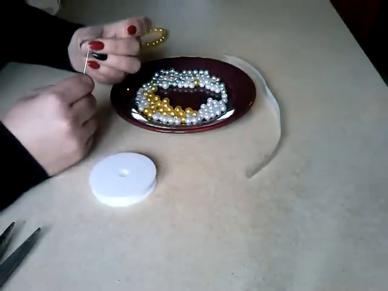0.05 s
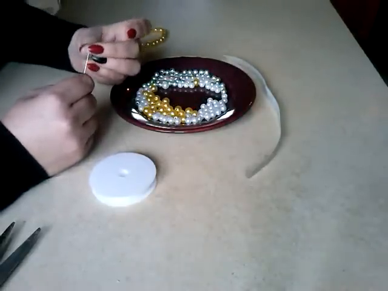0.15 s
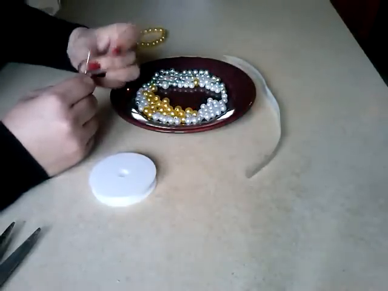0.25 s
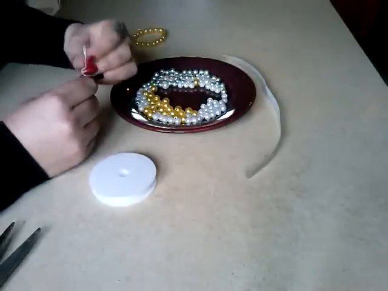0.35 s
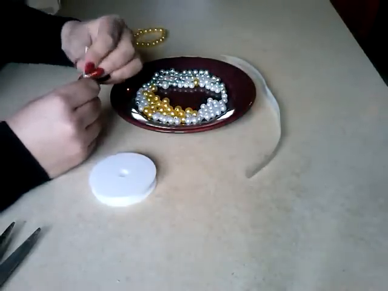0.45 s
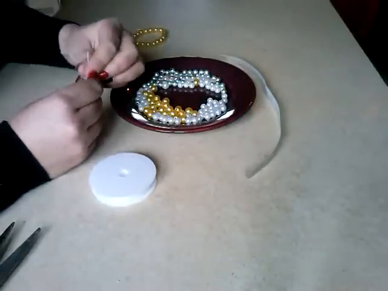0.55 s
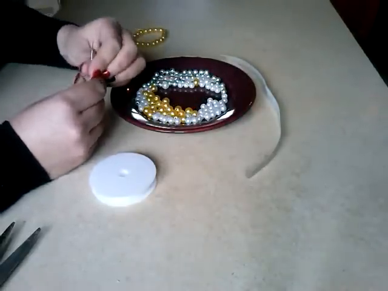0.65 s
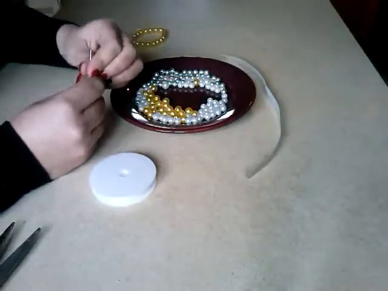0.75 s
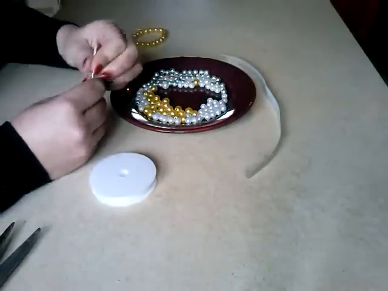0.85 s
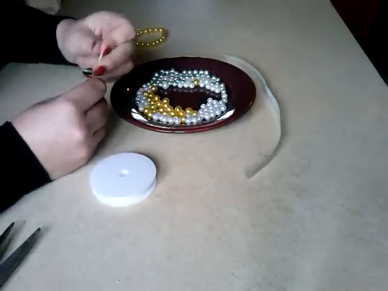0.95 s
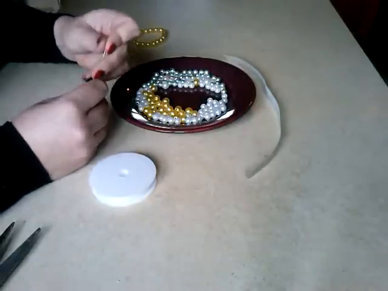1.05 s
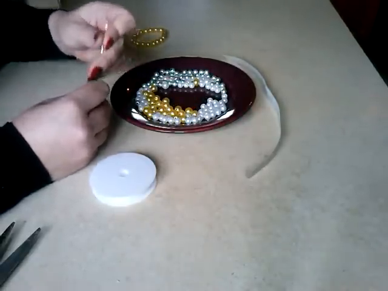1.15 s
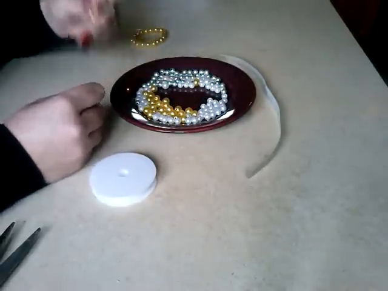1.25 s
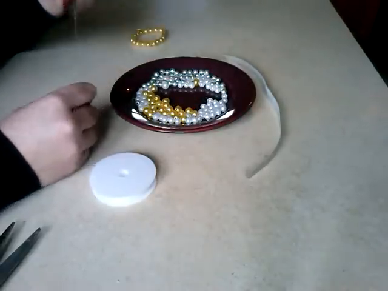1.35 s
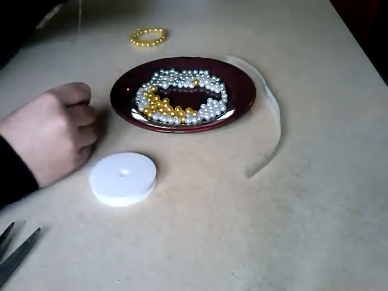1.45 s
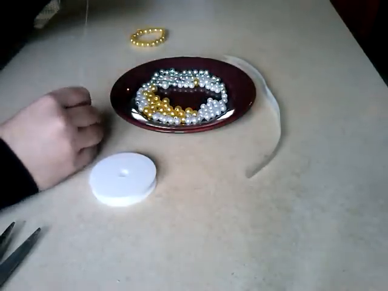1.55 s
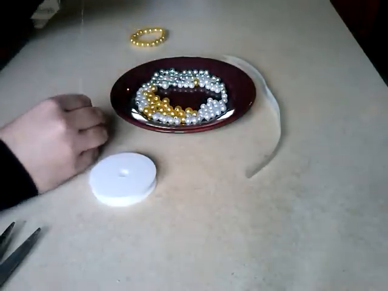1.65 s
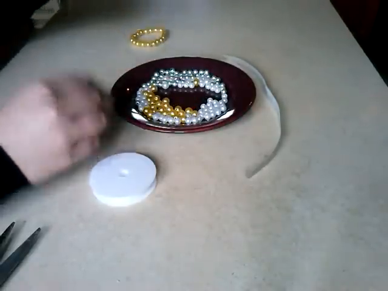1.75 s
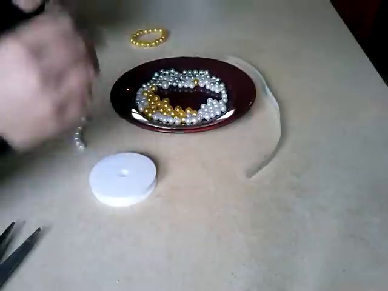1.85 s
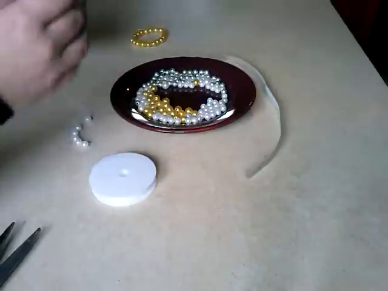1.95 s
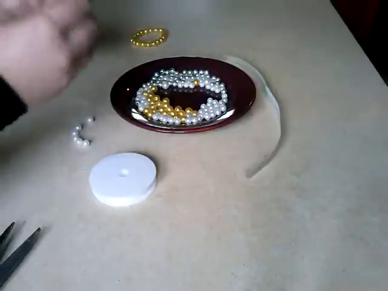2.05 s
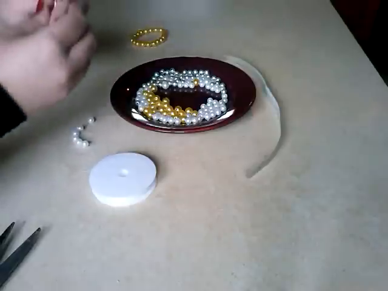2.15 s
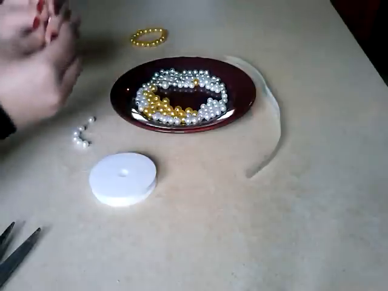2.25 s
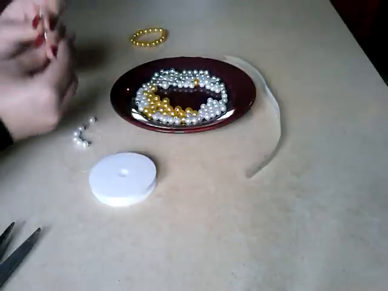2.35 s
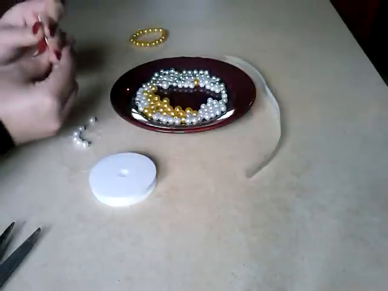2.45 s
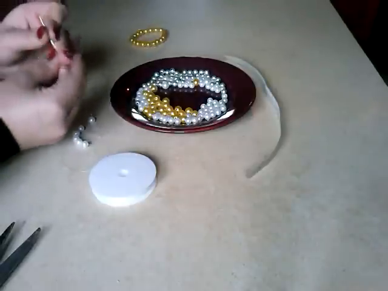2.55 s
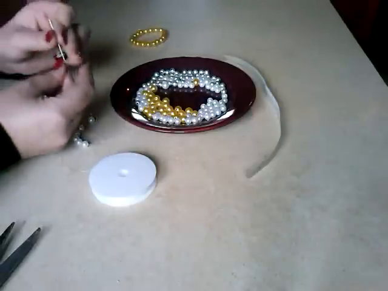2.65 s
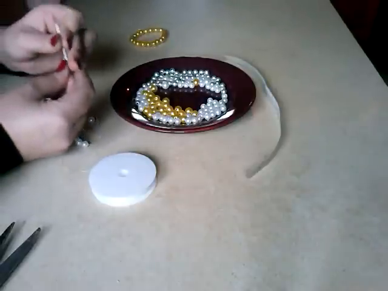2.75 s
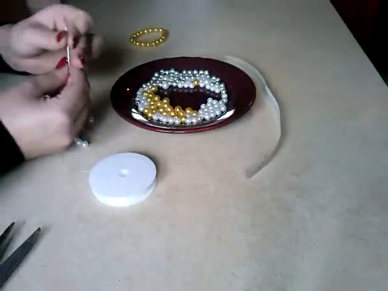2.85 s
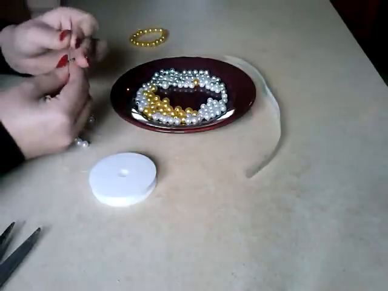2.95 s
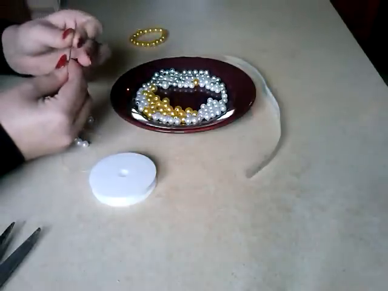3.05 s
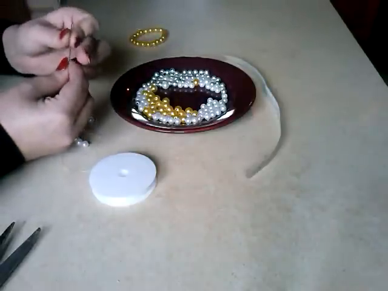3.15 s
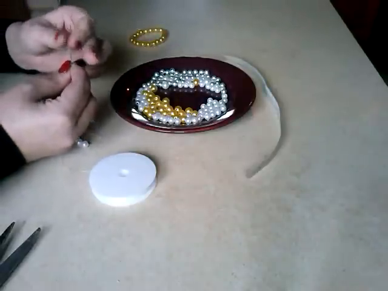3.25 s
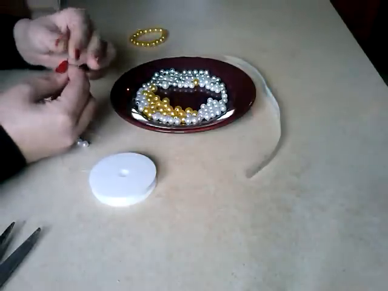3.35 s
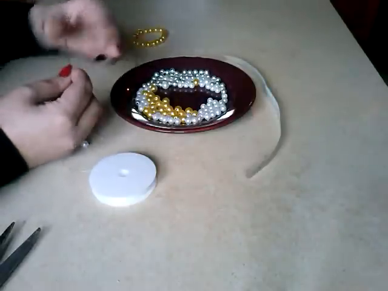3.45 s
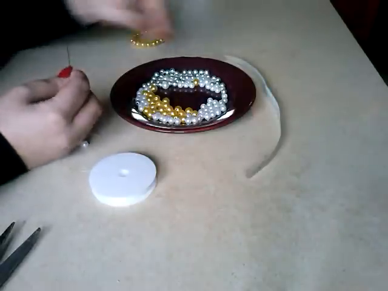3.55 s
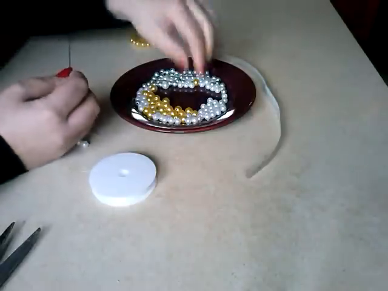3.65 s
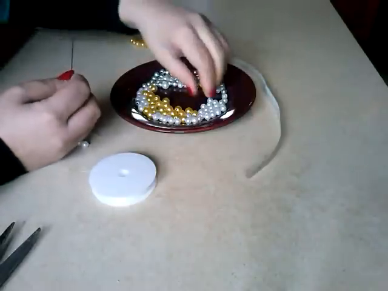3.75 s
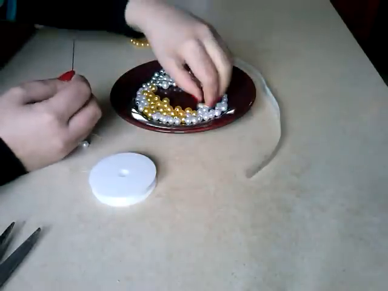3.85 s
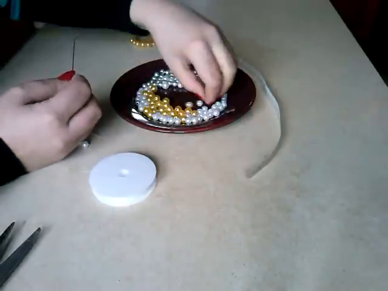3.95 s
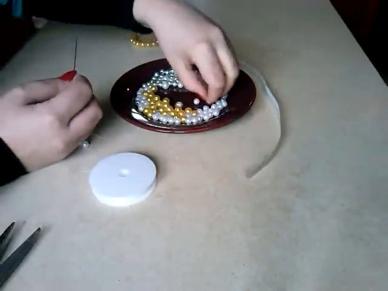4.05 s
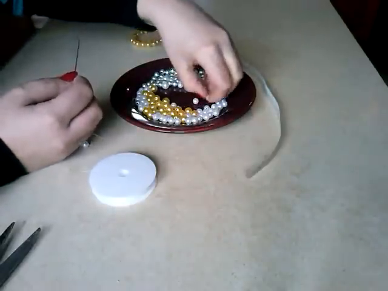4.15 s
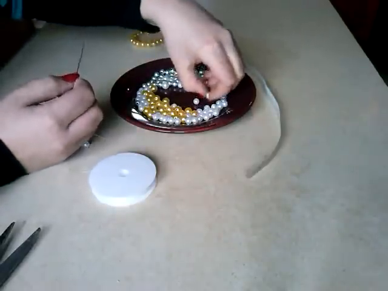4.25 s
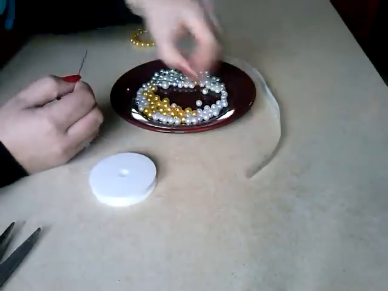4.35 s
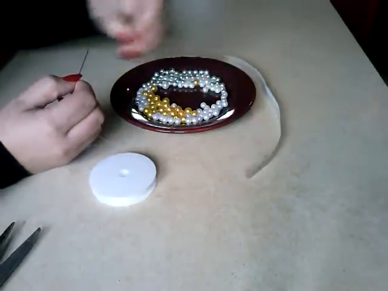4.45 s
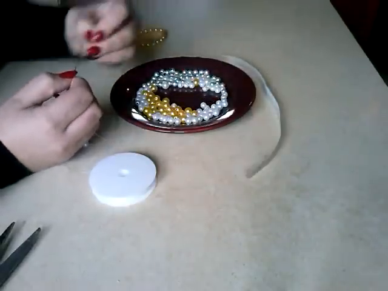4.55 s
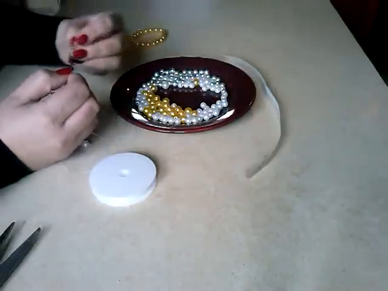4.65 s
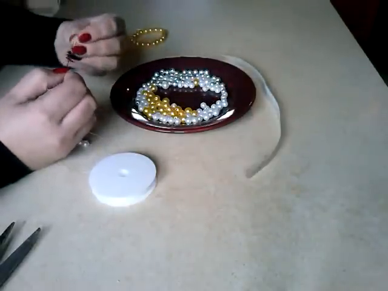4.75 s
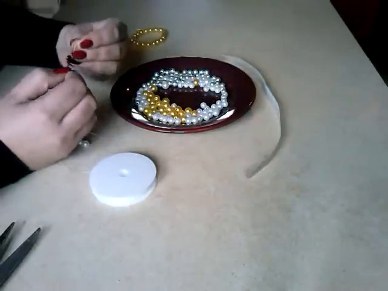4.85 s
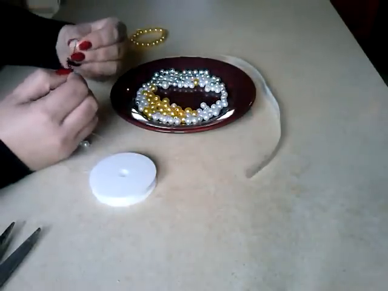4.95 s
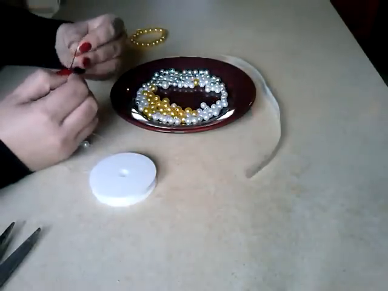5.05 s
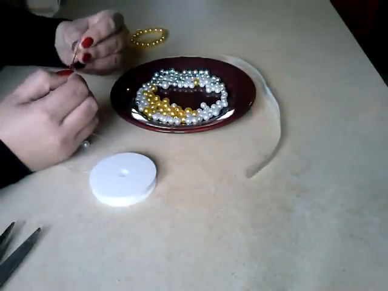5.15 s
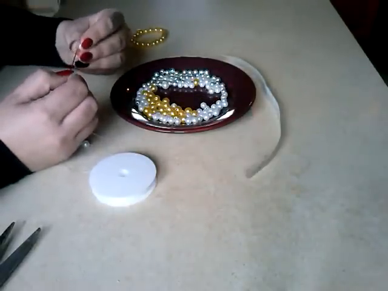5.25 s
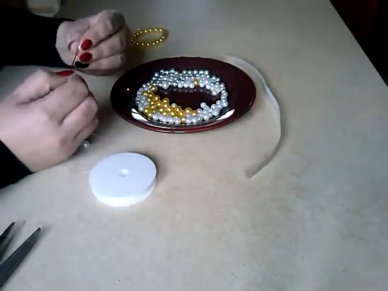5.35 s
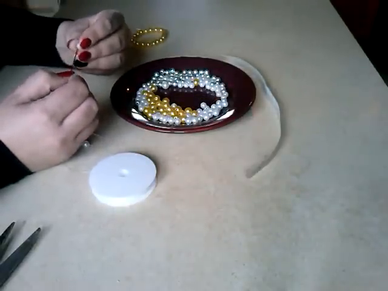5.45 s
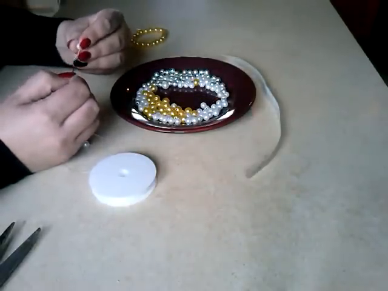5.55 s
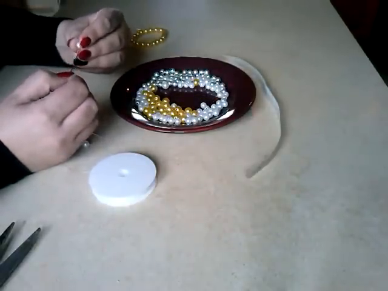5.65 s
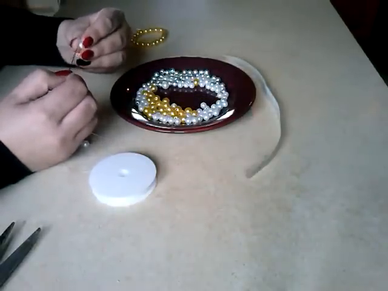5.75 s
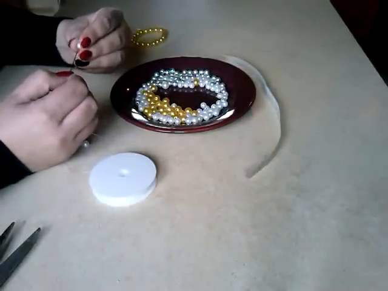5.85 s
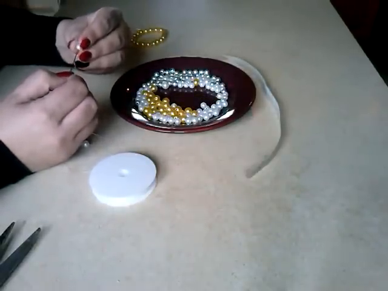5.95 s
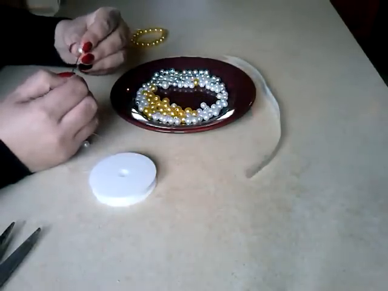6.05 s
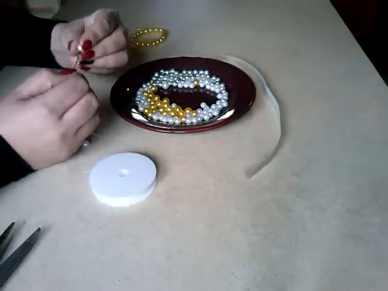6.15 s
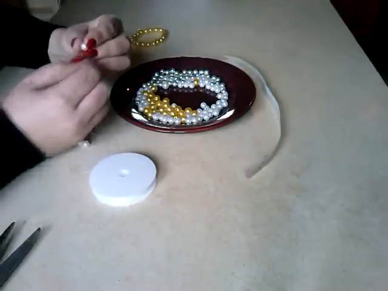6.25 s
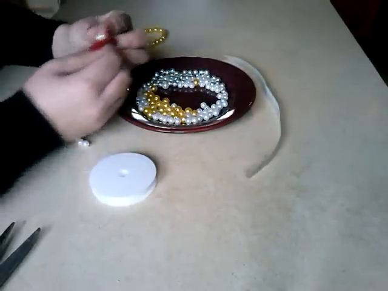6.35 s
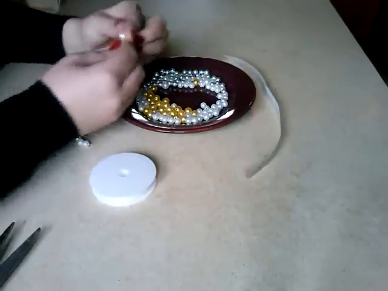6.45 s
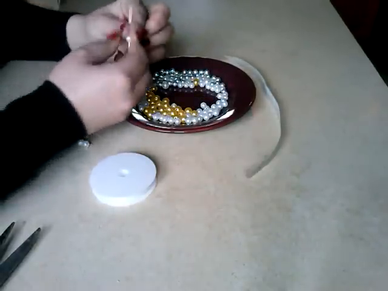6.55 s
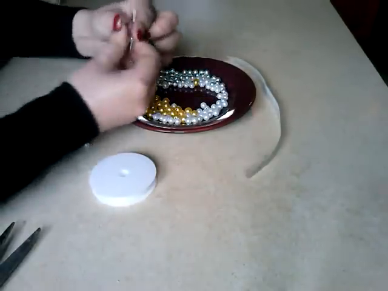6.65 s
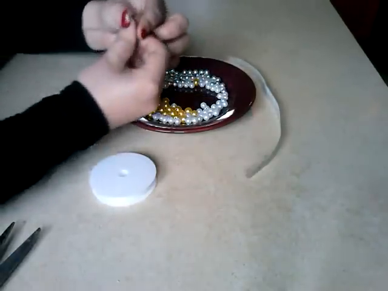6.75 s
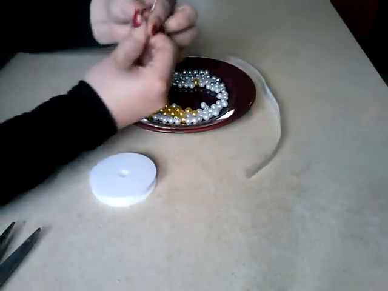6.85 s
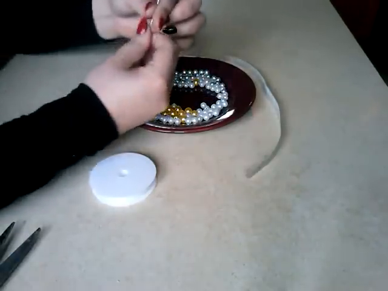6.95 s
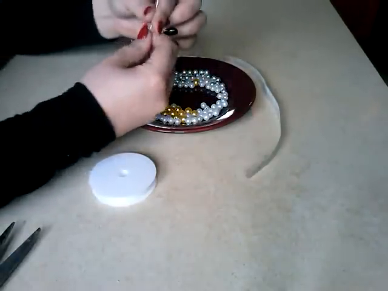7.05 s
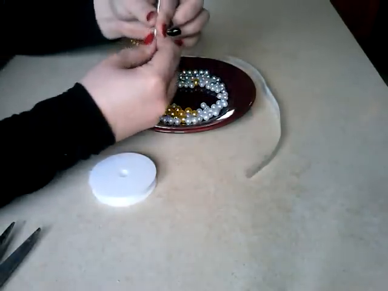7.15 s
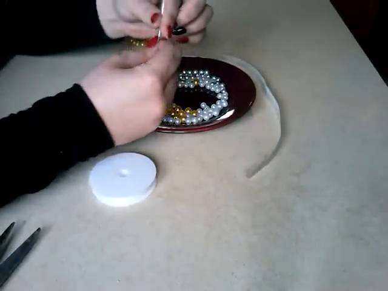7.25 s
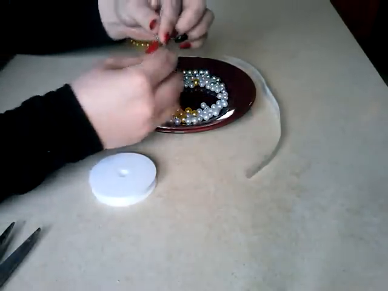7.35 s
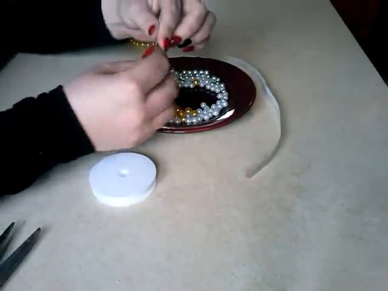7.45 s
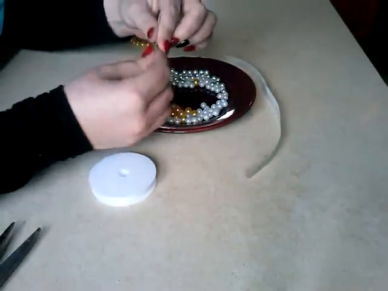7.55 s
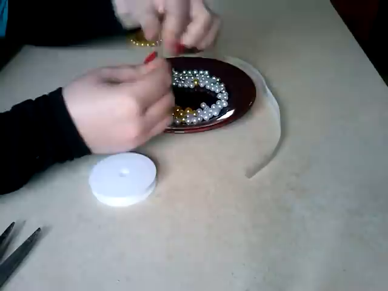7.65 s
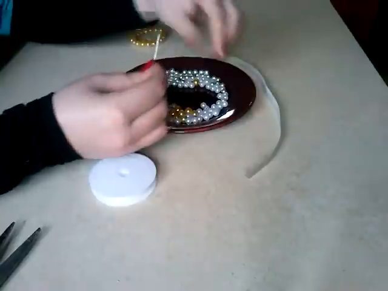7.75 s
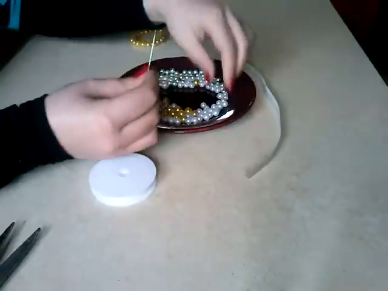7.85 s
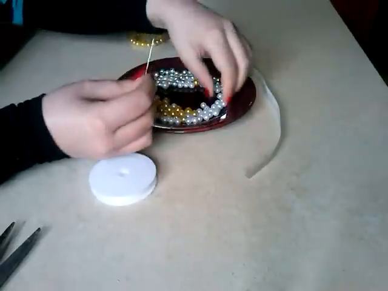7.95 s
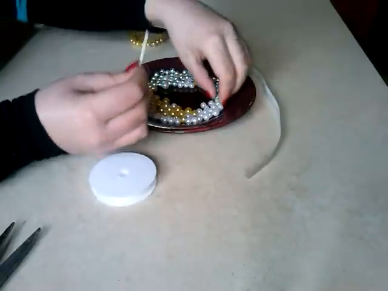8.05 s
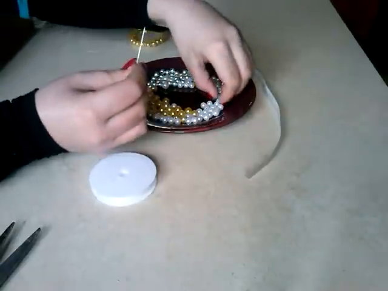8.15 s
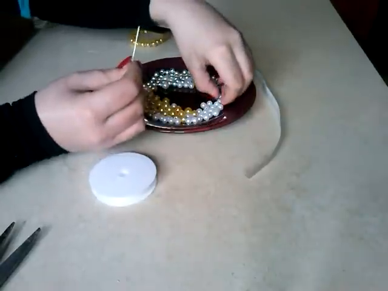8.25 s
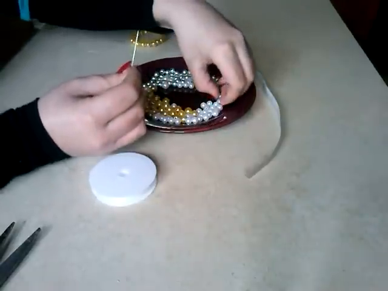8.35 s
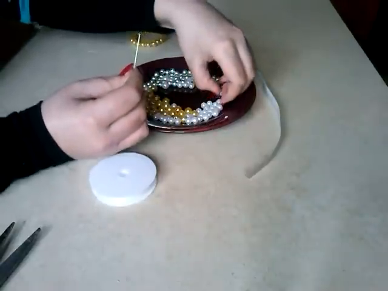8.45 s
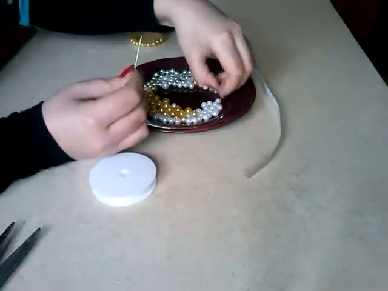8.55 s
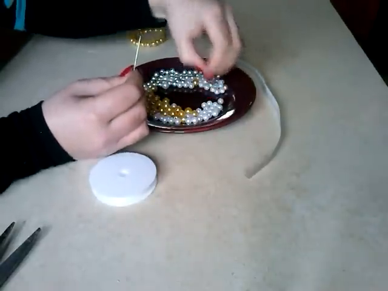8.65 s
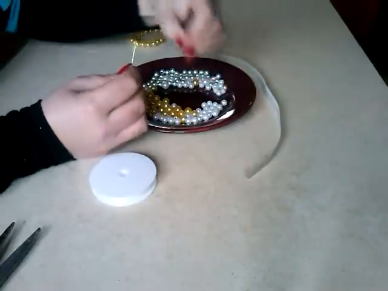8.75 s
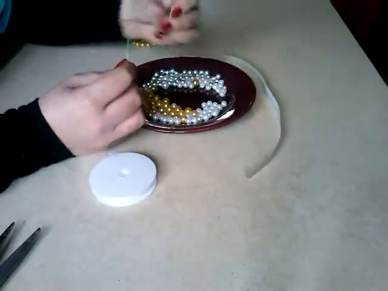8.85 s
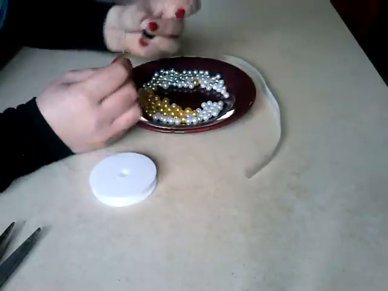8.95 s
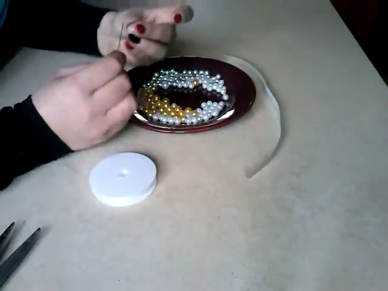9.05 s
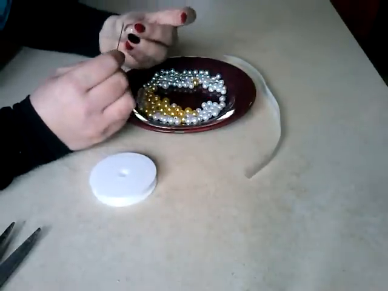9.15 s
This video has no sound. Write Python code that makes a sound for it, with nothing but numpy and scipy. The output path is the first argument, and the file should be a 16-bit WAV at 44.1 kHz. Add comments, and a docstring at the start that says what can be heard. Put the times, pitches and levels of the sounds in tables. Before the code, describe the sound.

Beads click and scatter on a hard tabletop, fingers rattle through a plate of beads, and a sharp plate clink rings while a clock ticks.

```python
"""Stringing beads at a table

Fingers stir a plate of beads, which rings in dying modes chosen by the place struck. Strung and loose
beads tick on the table top (short coloured clicks plus a knock), skitter and drag (random contacts, noise);
nails and wrists give soft blows, a wall clock rings its case once a second.
A quiet, hard room returns the clicks as echoes and dense tails, over faint hiss and hum."""
import sys
import numpy as np
from scipy import signal
from scipy.io import wavfile
from scipy.ndimage import uniform_filter1d

SR = 44100
rng = np.random.default_rng(int(sys.argv[2]) if len(sys.argv) > 2 else 0)


def file_out(sig):
    """Save sig as 16-bit WAV at sys.argv[1]."""
    # one column per channel
    cols = np.atleast_2d(sig).T
    # limit, then scale
    lim = np.clip(cols, -1, 1)
    pcm = np.round(lim * 32767).astype(np.int16)
    wavfile.write(sys.argv[1], SR, pcm)


def gain_from_db(level_db):
    """Convert decibel levels to linear amplitude factors (20 dB per decade)."""
    decades = np.asarray(level_db, float) / 20
    return 10 ** decades


N = 406161

# floor hiss: f/Hz, relative density/dB per Hz
HISS_COLOUR = [(20, -35.5), (40, -21.5), (75, -27.5), (150, -22), (400, -23), (1100, -25.5), (2000, -28.5),
               (4000, -29.5), (8000, -30), (9500, -27), (12000, -28.5), (15700, -29), (16000, -50),
               (16600, -72)]
HISS_RMS_DB = -62
# mains and motor tones: f/Hz, mean rms level/dB, wander/Hz
HUM_TONES = [(49.6, -71, 1.2), (98.7, -73, 1.8), (207, -84, 1.5), (440, -77.5, 2.3), (1080, -83, 3),
             (2550, -84, 11)]

# clock steps, fainter when the arms are in the way: t/s, level/dB
CLOCK_STEPS = [(.017, -46), (1.016, -48.5), (2.018, -45.5), (3.017, -43), (4.017, -42), (5.016, -43.5),
               (6.016, -46), (7.017, -48.5), (8.017, -65), (9.016, -47.5)]
# gear clicks within a step: lag/s, relative level/dB
GEAR_CLICKS = [(-.028, -6), (0, 0), (.005, -2), (.01, 0), (.045, -10)]
# clock case modes: f/Hz, relative level/dB, t60/s
CASE_MODES = [(1250, -10, 0.039), (2640, 3.5, 0.0081), (3670, -1.5, 0.014), (4290, 0.5, 0.012),
              (5230, 4.5, 0.005), (6770, -1, 0.005), (8970, 2.5, 0.004), (10200, -8, 0.0051)]
CLICK_SPREAD_DB, CASE_SPREAD_DB = 2.5, 4  # click to click, mode to mode

# beads ticking on table or each other: t of sound less TICK_BASE_S/s, tick level/dB, table knock level/dB
BEAD_TICKS = [(0.8868, -43, -71), (1.1767, -45.5, -69), (1.3409, -34, -65), (1.4061, -13.5, -30.5),
              (1.5424, -31.5, -40.5), (1.5914, -28, -47), (1.6577, -33, -43), (1.6641, -52, -45),
              (1.7497, -17.5, -32.5), (1.7572, -14, -32), (1.762, -18, -42), (1.8, -20.5, -60),
              (1.835, -23, -50), (1.8593, -27, -39.5), (2.3177, -39.5, -56), (2.4054, -37.5, -64),
              (2.6017, -36.5, -60), (4.1766, -34, -47.5), (6.3121, -42, -56), (7.0778, -40, -61),
              (7.4944, -37, -60), (7.9633, -29, -52), (7.9963, -12, -29.5), (8.1117, -16, -37.5),
              (8.1751, -17.5, -35.5), (8.1864, -18, -60), (8.23, -18.5, -40.5), (8.2728, -23.5, -41),
              (8.3024, -26.5, -50), (8.3322, -31.5, -44), (8.3536, -30, -48), (8.372, -39, -47),
              (9.0725, -41, -68)]
TICK_BASE_S = 0.0008  # time origin of the tick table
# colour of a bead's tick: f/Hz, level/dB
TICK_COLOUR = [(250, -48.5), (1500, -12.5), (3000, -9.5), (5200, -7), (7000, -5.5), (9000, -7), (11200, -1),
               (13500, -5), (15200, -7.5), (16500, -19)]
# table top modes: f/Hz, relative level/dB, t60/s
TABLE_MODES = [(130, -29, .08), (338, -17.5, 0.038), (558, -13.5, 0.018), (810, -7.5, 0.018),
               (1040, -8, 0.055), (1260, -1.5, 0.014), (1850, 1, 0.019), (2430, -11, 0.0056),
               (3040, 5, 0.0035)]

# sleeves and skin brushing: t of peak/s, level/dB, fall/dB per s
RUSTLES = [(0.9, -90, 60), (1.026, -56.5, 350), (1.23, -61.5, 59), (6.31, -59.5, 63), (6.656, -59, 58),
           (7.082, -62, 600)]
# string of beads settling and skittering on the table: t of peak/s, level/dB before layer gains, fall/dB per s
SKITTER_STROKES = [(1.54, -58, 105), (1.597, -52, 302), (1.665, -51.5, 430), (1.775, -44, 10)]
# nails catching needle or bead, duller than a tick: t/s, level/dB, f/Hz
NAIL_BLOWS = [(2.266, -49.5, 1700), (2.3175, -35, 6140), (2.3935, -46, 3740), (2.4058, -37.5, 7000),
              (2.602, -48, 2260), (2.6025, -39.5, 5500), (7.079, -48, 4500)]
# soft bumps of fingers and wrists: t/s, level/dB, f/Hz
BUMP_BLOWS = [(2.501, -51.5, 440), (3.368, -64, 450), (3.87, -45.5, 460), (3.896, -48, 135),
              (3.926, -46, 257), (3.953, -49.5, 133), (4.065, -52, 495), (4.335, -56, 395),
              (4.402, -61.5, 510), (4.598, -61, 447), (7.357, -58.5, 470), (7.933, -38, 950),
              (8.014, -37.5, 980), (8.077, -49.5, 130), (8.513, -45, 1040), (8.603, -47.5, 970)]
BUMP_ROOM_DB = -12  # bumps travel mostly through the table, little through the air

# beads and nails striking the plate: t/s, level/dB before layer gains, softness/0-1
PLATE_CLINKS = [(3.8318, -33.5, 0.14), (3.8597, -27, 0.4), (3.8992, -36, 0.1), (3.9645, -29.5, 0.7),
                (4.0911, -36.5, 0.15), (4.103, -36, 1), (4.299, -23.5, 0.08), (4.337, -24.5, 0.06),
                (4.3735, -25, 0.14), (4.4059, -24.5, 0.14), (4.4494, -30, 0.25), (4.4854, -34, 0.1),
                (4.5094, -33, 0.63), (5.33, -50.5, 0.2), (5.4944, -39, 0.33), (7.5749, -2.5, 0.1),
                (7.692, -10.5, 0.75), (7.7493, -18, 0.43), (7.773, -23, 0.1), (7.7896, -21, 0.09),
                (7.8075, -26.5, 0.4), (7.839, -34, 0.25), (8.3988, -30.5, 0.25), (8.5026, -38, 0.3),
                (8.517, -32.5, 0.02), (8.84, -49, 0.1)]
# where the plate is struck: t/s, place (0 rim, 1 bare well, 2 under the heap)
STRUCK_PLACE = [(4.2, 2), (4.29, 1), (4.7, 1), (5, .5), (7.4, .5), (7.5, 0), (7.98, 0), (8.3, 2)]
# plate modes: f/Hz
PLATE_MODES_HZ = [1000, 1750, 2261, 2821, 3596, 4075, 4885, 5420, 5525, 6422, 7084, 7900, 8515, 8705, 8802,
                  9900, 10000, 10130, 10640, 10775, 11150, 11640, 11850, 12030, 12570, 12645, 13790, 14390,
                  14765]
# same modes: level/dB at rim, at well, under heap (before the t60 correction), t60/s before loading
PLATE_MODES = [(-26, -19, -20.5, 0.014), (-18.5, -20.5, -18.5, 0.03), (-29.5, -10, -26, 0.029),
               (-12.5, -16, -20, 0.11), (-24.5, -8, -11, 0.03), (-6, -15.5, -16.5, 0.04),
               (-16, -9.5, -12, 0.041), (-22.5, -5.5, -9, 0.02), (1, -0.5, -7, 0.073),
               (-13.5, 2.5, -7, 0.057), (2.5, -20, -42, 0.26), (-9, -5, -8, 0.19), (-42, 6, 0.5, 0.13),
               (-15.5, -4.5, -27, 0.059), (-6.5, -21, -12, 0.04), (-26, -2, -52, 0.12),
               (-9.5, -9, -1.5, 0.29), (-21, -4, -21, 0.3), (5.5, -7, -19, 0.16), (-15, 7, 0, 0.14),
               (-32, -20, -30, .1), (-40, -2, -5.5, 0.11), (-4, -14, -30, 0.074), (-30, -25, -35, 0.092),
               (-2, -30, -18, 0.051), (-15, -25, -19, 0.19), (-11.5, 4, -14, 0.111),
               (-27.5, -23, -18, 0.16), (-9, -3.5, -35, 0.069)]
# share of t60 left at rim, well, heap, where beads weigh on the plate
LOADED_T60_SHARE = [1.0, 0.87, 0.64]
PLATE_RADIATES_HZ = 600  # the small plate sends little below this into the air
CLINK_TICK_DB = -6  # bare tick under the ring
BURST_DB, BURST_T60_S = -16, 0.011  # short noisy burst with each clink
# fingers pushing through the heap: t of peak/s, level/dB before layer gains, fall/dB per s
STIR_STROKES = [(3.872, -32.5, 138), (4.106, -43, 132), (4.18, -54, 280), (4.312, -38, 402),
                (4.338, -35.5, 119), (4.475, -39.5, 120), (8.402, -40.5, 83), (8.525, -47, 204)]
CONTACT_SPREAD_DB = 2

# string of beads dragged over the table: t of peak/s, level/dB, fall/dB per s
DRAG_STROKES = [(4.66, -59, 154), (6.6, -61, 150)]
# hardest clink shaking the microphone through the table: t/s, level/dB, length/s
JOLT_PUSH = (7.5746, -21.5, 0.0018)

STIR_RISE_DB_PER_S, SKITTER_RISE_DB_PER_S, RUSTLE_RISE_DB_PER_S, DRAG_RISE_DB_PER_S = 830, 750, 130, 81
REST_S = 0.28  # every motion is still this long after its peak

# first echoes off table, ceiling, walls: delay/s, level/dB
FIRST_ECHOES = [(.0013, -11), (.0031, -16), (.0101, -7), (.0105, -13), (.0172, -15), (.021, -14)]
# dense tail: f/Hz, t60/s
ROOM_T60 = [(300, 1), (1000, 0.49), (4000, 0.5), (10000, 0.39), (15000, 0.11)]
# colour of the dense tail: f/Hz, relative level/dB
TAIL_COLOUR = [(300, 2), (1500, -3.5), (4000, 1), (12000, 1.5)]
EDGE_HZ, OFFSET = 16300, 0.0018  # band limit, converter offset (full scale 1)


def read(points, hz):
    """Value of a (Hz, value) table on a log-frequency axis."""
    f, value = np.transpose(points)
    return np.interp(np.log(hz + 1), np.log(f + 1), value)


def evened(x):
    """Scales to rms 1."""
    return x / np.sqrt(np.mean(x ** 2) + 1e-20)


def train(t_s, db):
    """Single samples of given height at given times."""
    out = np.zeros(N)
    np.add.at(out, np.round(np.asarray(t_s) * SR).astype(int), gain_from_db(np.asarray(db)))
    return out


def heard(x, shape):
    """Every sample of x sounds the shape."""
    return signal.oaconvolve(x, shape)[:N]


def ring(hz, db, t60_s):
    """Struck body: dying sines of alternating sign, peak 1."""
    t = np.arange(SR // 2)[:, None] / SR
    sign = (-1) ** np.arange(len(hz))
    modes = sign * gain_from_db(db - 60 * t / t60_s) * np.sin(2 * np.pi * hz * t)
    x = modes.sum(axis=1)
    return x / abs(x).max()


def decay(db, t60_s, samples):
    """Exponential fall from a starting level."""
    return gain_from_db(db - 60 * np.arange(samples) / SR / t60_s)


def swell(strokes, rise_db_per_s):
    """Gain of motions that swell to a peak, fall steadily and come to rest."""
    out = np.zeros(N)
    t = np.arange(-SR // 2, SR // 2) / SR
    for peak_s, db, fall_db_per_s in strokes:
        slope_db = np.minimum(rise_db_per_s * t, -fall_db_per_s * t)
        to_rest = np.clip(4 - 4 * t / REST_S, 0, 1)
        out[round(peak_s * SR) - SR // 2:][:SR] += gain_from_db(db + slope_db) * to_rest
    return out


def noise(points, patchy_db):
    """Random short-time spectra of a given colour, with smoothed level patches; rms 1."""
    a, b, patches = rng.standard_normal((N // 256 + 5, 513, 3)).T
    patches = uniform_filter1d(patches, size=12, axis=0)  # over frequency
    patches = evened(uniform_filter1d(patches, size=14, axis=1))  # over time
    colour_db = read(points, np.fft.rfftfreq(1024, 1 / SR))[:, None]
    spectra = (a + 1j * b) * gain_from_db(colour_db + patchy_db * patches)
    return evened(signal.istft(spectra, nperseg=1024, noverlap=768)[1][:N])


def click():
    """Bead tick: minimum-phase, the shortest sound of its colour, peak 1."""
    log_gain = np.log(gain_from_db(read(TICK_COLOUR, abs(np.fft.fftfreq(2048, 1 / SR)))))
    x = np.fft.ifft(np.exp(np.conj(signal.hilbert(log_gain)))).real[:512]
    return x / abs(x).max()


def crowd(gain, per_s):
    """Random contacts of either sign, a few larger, evened to rms 1 ahead of the gain."""
    spread_db = CONTACT_SPREAD_DB * np.minimum(rng.exponential(1, N), 4)
    sizes = gain_from_db(spread_db) * rng.choice([-1, 1], N)
    struck = rng.random(N) < per_s / SR
    return evened(sizes * struck) * gain


def blows(rows):
    """Soft blows: a few dying cycles at the pitch of what gives way."""
    out = np.zeros(N)
    t = np.arange(2048) / SR
    for start_s, db, hz in rows:
        turns = hz * t
        envelope = 3 * turns * np.exp(-turns / 0.81)
        out[round(start_s * SR):][:len(t)] += gain_from_db(db) * np.sin(2 * np.pi * turns) * envelope
    return out


def room(x, tail_db):
    """First echoes, then three dense tails fed in turn so that like clicks do not fade alike."""
    hz, t, z = signal.stft(rng.standard_normal((3, SR)), SR, nperseg=128)
    fall_db = 60 * t / read(ROOM_T60, hz)[:, None]
    onset = np.clip(t / 0.0018, 0, 1)
    z = z * gain_from_db(read(TAIL_COLOUR, hz)[:, None] - fall_db) * onset
    tails = signal.istft(z, SR, nperseg=128)[1]
    turn = 2 * np.pi * (7 * np.arange(N) / SR + np.arange(3)[:, None] / 3)  # 7 Hz, three phases
    fed = x * np.cos(turn) * np.sqrt(2 / 3)
    late = sum(heard(f, tail / np.linalg.norm(tail)) for f, tail in zip(fed, tails))
    early = heard(x, train(*np.transpose(FIRST_ECHOES))[:2048])
    return x + early + gain_from_db(tail_db) * late


def hiss():
    """Steady coloured noise floor."""
    return gain_from_db(HISS_RMS_DB) * noise(HISS_COLOUR, patchy_db=1.5)


def hum():
    """Mains and motor tones whose pitch and level wander."""
    out = np.zeros(N)
    for hz, db, wander_hz in HUM_TONES:
        level_db, pitch = signal.resample(rng.standard_normal((90, 2)), N, axis=0).T
        phase = 2 * np.pi * np.cumsum(hz + wander_hz * pitch) / SR
        out += gain_from_db(db + level_db) * np.sqrt(2) * np.sin(phase)
    return out


def clock():
    """Each second the gears make a few small clicks that ring the case, never quite alike."""
    lag_s, gear_db = np.transpose(GEAR_CLICKS)
    hz, mode_db, t60_s = np.transpose(CASE_MODES)
    out = np.zeros(N)
    for step_s, db in CLOCK_STEPS:
        click_db = db + gear_db + CLICK_SPREAD_DB * rng.standard_normal(len(lag_s))
        clicks = train(np.maximum(step_s + lag_s, 0), click_db)
        case_db = mode_db + CASE_SPREAD_DB * rng.standard_normal(len(hz))
        out += heard(clicks, ring(hz, case_db, t60_s)[:2048])
    return out


def ticks():
    """Hard clicks, each with its own scatter, and a short knock in the table top."""
    t_s, tick_db, knock_db = np.transpose(BEAD_TICKS)
    t_s = t_s + TICK_BASE_S
    hits = train(t_s, tick_db)
    scatter = heard(hits, decay(-14, 0.0061, 600)) * rng.standard_normal(N)
    knocks = heard(train(t_s, knock_db), ring(*np.transpose(TABLE_MODES)))
    return heard(hits + scatter, click()) + knocks


def rustle():
    """Sleeves and skin: swelling treble-weighted noise."""
    colour = [(500, -9.0), (3000, -1.5), (10000, 0.0), (16000, -1)]
    return swell(RUSTLES, RUSTLE_RISE_DB_PER_S) * noise(colour, patchy_db=5.0)


def skitters():
    """String of beads settling: random contacts that tick and knock the table top."""
    contacts = crowd(swell(SKITTER_STROKES, SKITTER_RISE_DB_PER_S), per_s=400)
    knocks = heard(gain_from_db(-28) * contacts, ring(*np.transpose(TABLE_MODES)))
    return heard(gain_from_db(-10.0) * contacts, click()) + knocks


def nails():
    """Fingernails catching needle or bead: short pitched blows."""
    return blows(NAIL_BLOWS)


def bumps():
    """Fingers and wrists: soft blows, direct plus a weak share through the room."""
    direct = blows(BUMP_BLOWS)
    return direct + gain_from_db(BUMP_ROOM_DB) * room(direct, tail_db=0)


def plate_ring(contacts):
    """Contacts excite the plate; the place struck picks the loud modes."""
    *places_db, t60_s = np.transpose(PLATE_MODES)
    hz = np.array(PLATE_MODES_HZ)
    place = np.interp(np.arange(N) / SR, *np.transpose(STRUCK_PLACE))
    rings = np.zeros(N)
    for k, db in enumerate(places_db):
        share = np.clip(1 - abs(place - k), 0, 1)
        start_db = db - 20 * np.log10(t60_s)  # the longer the ring, the lower its start
        rings += heard(contacts * share, ring(hz, start_db, t60_s * LOADED_T60_SHARE[k]))
    highpass = signal.butter(2, PLATE_RADIATES_HZ, "high", fs=SR, output="sos")
    return signal.sosfilt(highpass, rings)


def plate():
    """Clinks and stirred rattle ring the plate, with ticks and noisy bursts; the pushed plate rumbles."""
    t_s, db, soft = np.transpose(PLATE_CLINKS)
    soft = np.clip(soft, 0.01, 0.99)
    hard_hits = train(t_s, db + 20 * np.log10(1 - soft))
    # a soft contact lasts longer and misses the high modes
    soft_hits = heard(train(t_s, db + 20 * np.log10(soft)), np.hanning(7) / 2)
    clinks = hard_hits + soft_hits
    stir = swell(STIR_STROKES, STIR_RISE_DB_PER_S)
    rattle = crowd(stir, per_s=900)
    bursts = heard(train(t_s, db), decay(BURST_DB, BURST_T60_S, 1500)) * rng.standard_normal(N)
    bare = heard(gain_from_db(CLINK_TICK_DB) * clinks + bursts + gain_from_db(-21) * rattle, click())
    rumble_colour = [(70, 3), (140, -7), (300, -0.5), (550, 10.5), (1000, -49.0)]
    rumble = gain_from_db(-24.5) * stir * noise(rumble_colour, patchy_db=7.0)
    return plate_ring(clinks + gain_from_db(-23.5) * rattle) + bare + rumble


def drag():
    """String of beads dragged over the table: dull, narrow noise."""
    colour = [(900, -16), (1500, -5), (1750, 4), (2300, -8), (4000, -25)]
    return swell(DRAG_STROKES, DRAG_RISE_DB_PER_S) * noise(colour, patchy_db=0.5)


def jolt():
    """One short push of the microphone membrane."""
    t_s, db, length_s = JOLT_PUSH
    return heard(train([t_s], [db]), np.hanning(round(length_s * SR)))


def scene():
    """Near sounds through the room, the far clock wetter, over the floor."""
    floor = hiss() + hum()
    far = room(clock(), tail_db=3)
    table = room(ticks() + skitters(), tail_db=2.5)
    hands = rustle() + room(nails(), tail_db=-1.5) + bumps()
    dish = room(plate(), tail_db=-0.5)
    return (floor + far + table + hands + dish + drag() + jolt())[None]


def band_limit(x):
    """A steep low-pass at the top of the band."""
    return signal.sosfilt(signal.butter(12, 17070, fs=SR, output="sos"), x)


def record(dry):
    """Band limit and converter offset."""
    lowpass = signal.firwin(255, EDGE_HZ, window=("kaiser", 8), fs=SR)
    mix = signal.oaconvolve(dry, lowpass[None], "same") + OFFSET
    return band_limit(mix)


dry = scene()
out = record(dry)
file_out(out)
```